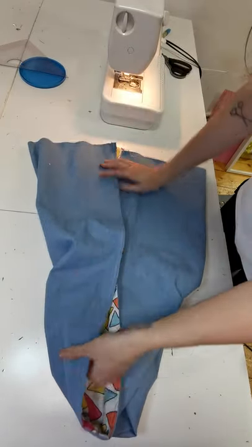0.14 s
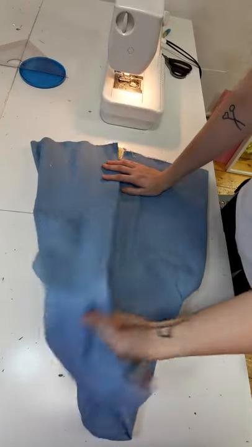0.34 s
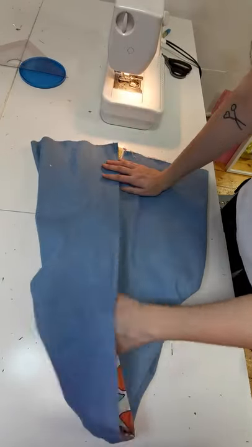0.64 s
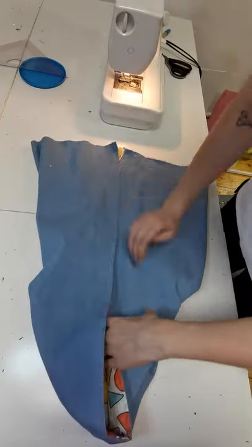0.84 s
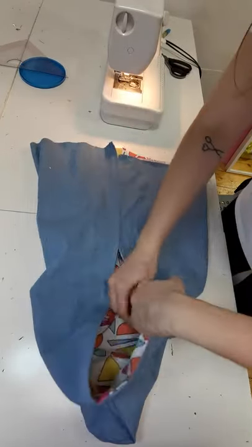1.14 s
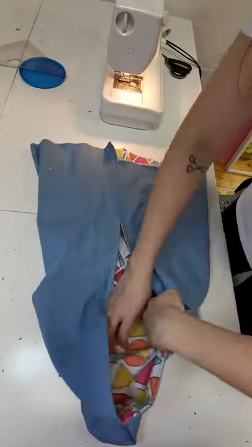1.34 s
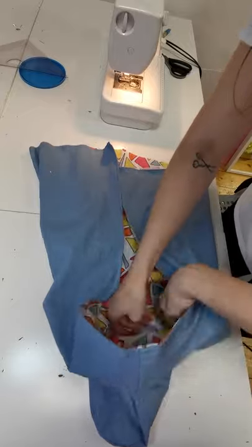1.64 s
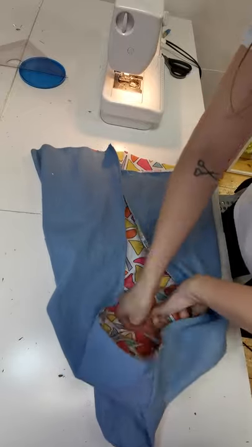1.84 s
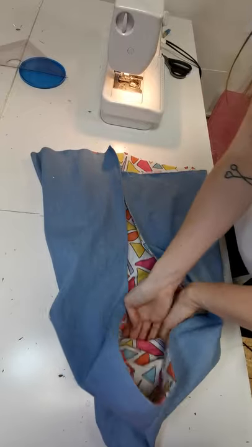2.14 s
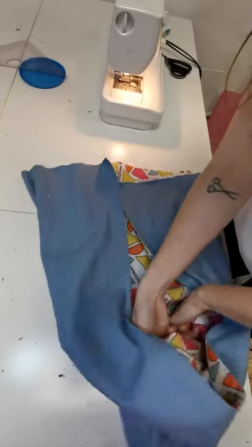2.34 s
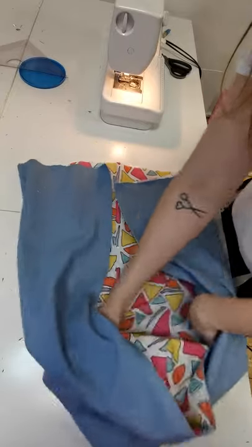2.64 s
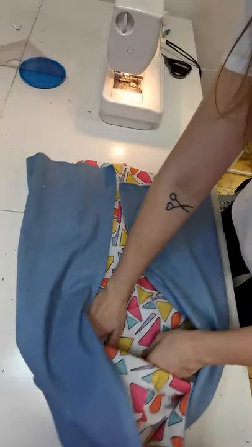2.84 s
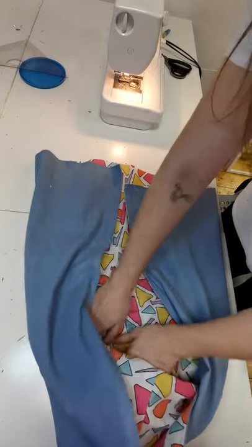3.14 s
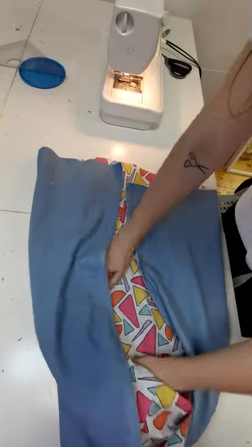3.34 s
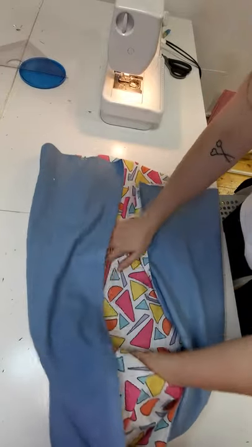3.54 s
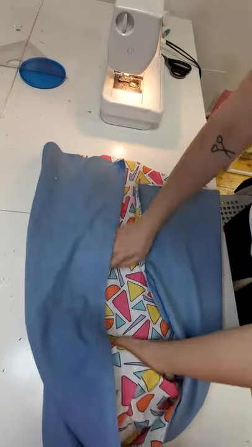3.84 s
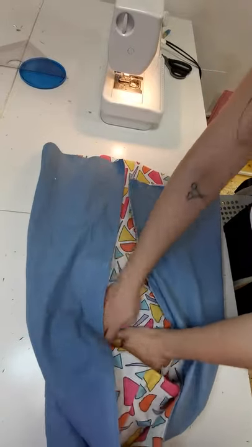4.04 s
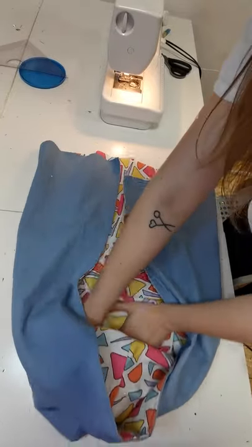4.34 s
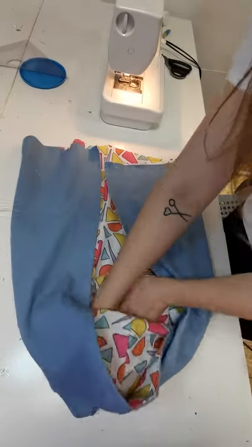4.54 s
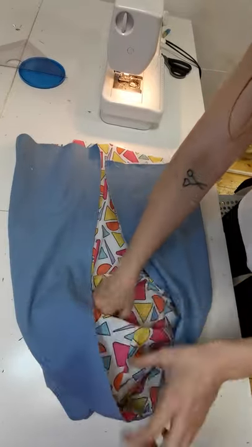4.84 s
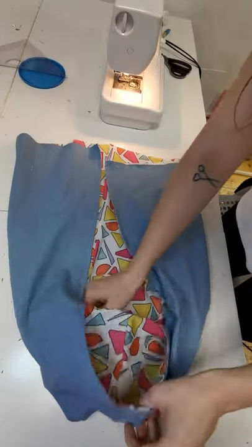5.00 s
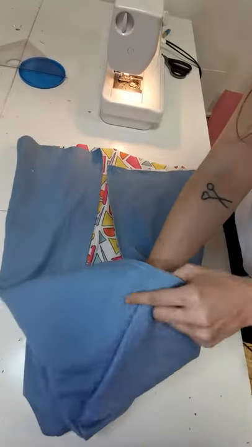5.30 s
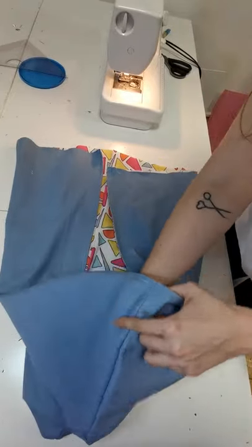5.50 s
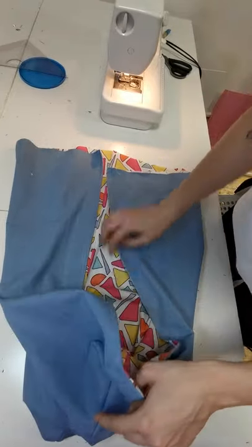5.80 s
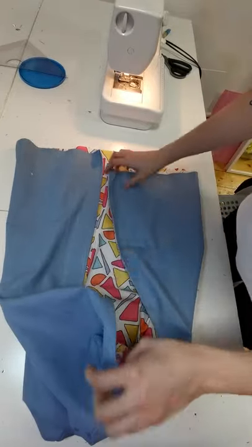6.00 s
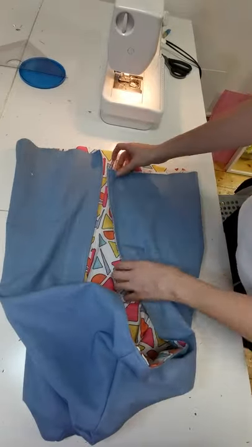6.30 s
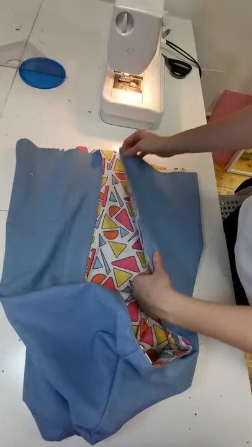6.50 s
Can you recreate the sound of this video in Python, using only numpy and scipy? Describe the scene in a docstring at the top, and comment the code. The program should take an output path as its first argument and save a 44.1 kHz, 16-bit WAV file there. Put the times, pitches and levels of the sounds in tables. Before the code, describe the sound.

Heavy lined cloth is turned and smoothed on a table, with hissing rustles, soft pats and one firm hand thump near the end.

```python
"""Thick lined cloth is turned and smoothed on a sewing table: thread catching on thread makes a hiss.
Its heavy folds drag with a dull rustle, a palm scrapes the weave and creases pop over in short pushes.
The bundle judders over the tabletop and the swinging sheet wafts slow air at the microphone ports.
Hands and slack cloth pat the table, once with a firm thump, each blow ringing modes and a small room.
Faint air noise and a low hum lie under it all."""
import sys
import numpy as np
from scipy import signal
from scipy.fft import rfft, irfft, next_fast_len
from scipy.io import wavfile
from scipy.ndimage import map_coordinates

SR = 44100
rng = np.random.default_rng(int(sys.argv[2]) if len(sys.argv) > 2 else 0)


def to_wav(sig):
    """Store sig (one row per channel, or 1-D mono) as 16-bit WAV at the path in sys.argv[1].

    Samples outside -1..1 are clipped; the rate is SR.
    """
    pcm = np.clip(np.atleast_2d(sig), -1, 1) * 32767
    pcm = np.round(pcm).astype(np.int16)
    wavfile.write(sys.argv[1], SR, pcm.T)  # frames by channels


N = 293706  # samples

# Levels in the tables are relative: the trims in the functions shift them. Spectra give shape only.
# Pulls on the cloth. Each row: fastest moment in seconds, speeding-up time in seconds,
# slowing-down time in seconds, hiss in dB, rustle in dB, lift of the treble over the rest in dB.
PULLS = [(0.11, 0.04, 0.27, -68, -70.5, 3.5), (0.288, 0.027, 0.055, -65, -63, 1),
         (0.39, 0.052, 0.019, -53, -61.5, 5), (0.555, 0.064, 0.042, -65.5, -68.5, -1),
         (1.04, 0.13, 0.053, -66.5, -70, 2), (1.35, 0.15, 0.45, -70, -85, 1),
         (1.78, 0.16, 0.71, -77.5, -73.5, -7), (2.3, 0.33, 0.026, -74, -71.5, 6),
         (2.54, 0.12, 0.1, -63.5, -60.5, -0.5), (2.92, 0.082, 0.057, -72, -60, -4),
         (3.298, 0.047, 0.06, -60, -56.5, -1), (3.605, 0.044, 0.053, -60, -57.5, 2),
         (3.66, 0.04, 0.03, -62, -70, 4), (4.03, 0.099, 0.089, -68.5, -70, 2),
         (4.27, 0.077, 0.074, -68.5, -61.5, 0), (4.45, 0.12, 0.083, -64, -59.5, -4.5),
         (4.67, 0.064, 0.093, -71.5, -73.5, 1), (5.02, 0.1, 0.21, -70.5, -72, 1),
         (5.2, 0.034, 0.076, -68.5, -61.5, 4), (5.57, 0.044, 0.089, -74, -79, 0),
         (6.02, 0.11, 0.14, -73, -96, 6.5), (6.35, 0.037, 0.031, -77, -63.5, -7),
         (6.6, 0.098, 0.036, -67.5, -95, 4.5)]
# Light, constant shifting between pulls. Each row: time in seconds, hiss in dB.
SHIFTING = [(0, -71.5), (0.47, -74.5), (0.66, -69), (0.78, -77.5), (1.15, -72.5), (1.9, -72), (2.02, -81.5),
            (2.15, -70), (2.75, -70.5), (3.1, -75), (3.5, -72), (3.8, -72.5), (4.6, -73), (4.87, -78),
            (5.35, -71), (5.8, -79), (6.2, -79), (6.4, -74.5)]
# Spectrum of the weave's hiss. Each row: frequency in Hz, density in dB per Hz.
WEAVE = [(800, -3), (2000, 3), (3300, 0), (4800, 0), (7000, 0), (8000, -2), (10800, -3.5), (13200, -7),
         (14100, -11.5), (15500, -7.5)]
# Spectrum of the folds' rustle. Each row: frequency in Hz, density in dB per Hz.
RUSTLE = [(120, 1), (220, 2), (320, 5), (520, -1.5), (800, 1), (1200, -7), (1650, -12.5), (2100, -10),
          (2700, -16), (3500, -28.5), (7000, -27.5)]
# Treble resonances of the microphone ports.
# Each row: frequency in Hz, half width at half amplitude in Hz, level in dB for an unlifted treble.
LEFT_PORT = [(9250, 240, -0.5)]
RIGHT_PORT = [(10830, 400, -5.5), (13600, 300, -6)]
# A palm or forearm rubbing the cloth. Each row: fastest moment in seconds, speeding-up time in seconds,
# slowing-down time in seconds, level in dB, scrape pitch in Hz, glide in octaves per second.
PALM = [(0.2, 0.19, 0.26, -66, 2080, 0), (1.33, 0.04, 0.053, -61, 2410, 1.29),
        (1.74, 0.2, 0.28, -65.5, 1960, 0.027)]
# Spectrum of skin on cloth. Each row: frequency in Hz, density in dB per Hz.
SKIN = [(700, -14), (1300, 7.5), (1700, 2), (2100, -2), (2600, 0), (3200, -13.5)]
# Creases flicking over. Each row: time in seconds, peak in dB, pitch in Hz.
FLICKS = [(0.168, -46, 900), (0.399, -53, 900), (0.636, -41, 476), (0.9306, -42.5, 663),
          (1.2304, -40.5, 634), (1.348, -43.5, 820), (1.7996, -44, 750), (1.8231, -40, 590),
          (2.452, -40, 650), (2.476, -32.5, 500), (2.554, -38, 428), (2.5716, -42, 635), (2.891, -46, 650),
          (2.9279, -34.5, 646), (3.313, -48, 900), (3.557, -48, 800), (3.589, -37, 750),
          (3.597, -35.5, 486), (4.202, -40, 560), (4.265, -41.5, 596), (4.61, -44, 576), (4.9495, -37, 890),
          (5.273, -37.5, 854), (5.287, -37, 1240), (5.6288, -45, 766), (6.336, -47, 1900)]
# The bundle shoved over the tabletop. Each row: fastest moment in seconds, speeding-up time in seconds,
# slowing-down time in seconds, level in dB, upper edge in Hz.
SHOVES = [(0.16, 0.17, 0.12, -51, 288), (2.6, 0.26, 0.06, -57, 258), (3.12, 0.22, 0.22, -51.5, 100),
          (3.7, 0.26, 0.051, -52.5, 141), (4.25, 0.11, 0.049, -62, 293)]
# Air pushed by the moving sheet. Each row: time in seconds, level in dB.
WAFT = [(0, -45.5), (0.17, -47.5), (0.3, -53.5), (0.8, -57.5), (1.5, -64), (2.3, -62.5), (2.85, -58),
        (3.15, -56), (3.7, -59.5), (4.5, -66), (6.66, -63)]
# Spectrum of the moving air. Each row: frequency in Hz, density in dB per Hz.
AIR = [(8, -6), (22, -1), (38, -5.5), (55, -12), (80, -25), (130, -15.5), (300, -65)]
# Soft blows on the table. Each row: time in seconds, peak in dB, pitch of the push in Hz.
PATS = [(0.191, -42.5, 133), (1.853, -28.5, 300), (1.892, -42, 260), (2.1192, -33.5, 298),
        (2.278, -44, 153), (2.7315, -30, 213), (2.749, -37, 198), (2.771, -45, 220), (2.8469, -33, 280),
        (3.258, -27.5, 210), (3.2799, -36, 300), (3.598, -37, 330), (3.603, -37, 99), (3.895, -48.5, 109),
        (4.0412, -40.5, 100), (4.067, -37, 238), (4.148, -49, 300), (4.185, -43, 297), (4.275, -47, 260),
        (4.4091, -35.5, 306), (4.4227, -41.5, 93), (4.442, -42, 340), (4.4943, -39, 300),
        (6.3532, -29.5, 199)]
# Modes of the tabletop, detuned a little at each blow. Each row: frequency in Hz, level in dB, t60 in seconds.
TABLE = [(102.5, -17, 0.27), (123.6, -20, 0.2), (166.7, -22, 0.29), (256.5, -30.5, 0.18), (290, -28, 0.19),
         (325, -24, 0.24), (441, -30, 0.27), (550.6, -27.5, 0.27), (596, -20, 0.096), (653, -31, 0.3)]
# Spectrum of the table's many weak modes. Each row: frequency in Hz, density in dB per Hz.
CROWD = [(70, -35), (130, 7), (200, 0), (290, 2), (440, -4), (505, -20), (620, 1), (760, -20), (950, -20),
         (1400, -60)]
# Spectrum of the still room. Each row: frequency in Hz, density in dB per Hz.
QUIET = [(22, -4), (35, -10.5), (70, 0.5), (112, 1), (140, -6.5), (400, -9), (700, -14), (1230, -17),
         (2030, -19), (3750, -27), (9500, -45.5), (15500, -34)]
# The room's hum. Each row: frequency in Hz, level in dB.
HUM = [(100, -61), (164, -70.5), (456, -76)]
# The cloth lies to the right. Each row: frequency in Hz, left minus right in dB.
CLOTH_SIDE = [(300, 1.5), (560, -7.5), (1500, -4.5), (7500, -2.5), (11000, -6), (14000, -10.5)]
# Likeness of the two ports in a diffuse field. Each row: frequency in Hz, correlation.
ALIKE = [(120, 0.89), (300, 0.87), (600, 0.34), (1100, 0.048), (3000, 0.02), (15000, 0.027)]
# Decay of the room. Each row: frequency in Hz, t60 in seconds.
ROOM = [(100, 0.31), (300, 0.28), (1000, 0.17), (8000, 0.092)]

STROKE_SHAPE = 2.32  # exponent: 2 is a bell; more is flatter on top with steeper flanks
SHIFT_RUSTLE_DB = 2.5  # rustle of the light shifting over its hiss
# table ring under a firm blow; a push slower than FIRM_HZ sets the top moving more
RING_DB, FIRM_HZ, PRESS_DB_PER_OCTAVE = 4, 197, 12
# the firm thump: a hand lands in quick contacts, each later, weaker and softer than the last
THUMP_S, THUMP_DB, THUMP_HZ, THUMP_RING_DB = 6.2712, -17.5, 308, 8
CONTACT_GAP_S, GAP_GROWS, CONTACT_LOSS_DB, CONTACT_SOFTENS = 0.00703, 1.15, 2, 0.38
HAND_DAMPS_DB = 3.5  # less ring at each contact as the hand settles
QUIET_DB = -64  # air noise of the still room, rms
TOP_HZ = 15780  # band limit


def amp(db):
    """A level in decibels is twenty times the logarithm of this gain."""
    return 10 ** (np.asarray(db) / 20)


def unit(x):
    """Dividing by the root mean square gives unit power."""
    return x / np.sqrt(np.mean(x ** 2) + 1e-20)


def along(points, hz):
    """Interpolate (Hz, value) rows on a logarithmic frequency axis."""
    f, v = np.transpose(points)
    return np.interp(np.log(hz + 1), np.log(f + 1), v)


def curve(rows):
    """Interpolate (second, value) rows linearly, one value per sample."""
    return np.interp(np.arange(N) / SR, *np.transpose(rows))


def wobble(rate):
    """Smooth random fluctuation: a spline through random knots, rate of them per second."""
    knots = rng.standard_normal(int(N * rate / SR) + 4)
    return map_coordinates(knots, [np.arange(N) * rate / SR])


def filtered(x, response):
    """Linear filtering: the spectrum of x is multiplied by a response of frequency."""
    size = x.shape[-1]
    padded = next_fast_len(size + 8192)
    spectrum = rfft(x, padded) * response(np.fft.rfftfreq(padded, 1 / SR))
    return irfft(spectrum, padded)[..., :size]


def add(track, s, sound):
    """Superposition: pressures add from time s on."""
    start = max(round(s * SR), 0)
    part = track[..., start:start + sound.shape[-1]]
    part += sound[..., :part.shape[-1]]


def spread(pair):
    """Diffuse-field coherence: two unrelated signals become alike in the bass, unrelated in the treble."""
    turn = lambda hz: np.arccos(np.clip(along(ALIKE, hz), -1, 1)) / 2
    mid, side = filtered(pair, lambda hz: np.array([np.cos(turn(hz)), np.sin(turn(hz))]))
    return np.array([mid + side, mid - side])


def to_right(pair):
    """Acoustic shading: the left port is turned from the cloth, by an amount that varies with frequency."""
    return filtered(pair, lambda hz: amp(np.outer([.5, -.5], along(CLOTH_SIDE, hz))))


def coloured(pair, spectrum):
    """Spectral shaping of a diffuse field whose mid then has rms 1."""
    out = filtered(spread(pair), lambda hz: amp(along(spectrum, hz)))
    return out / np.std(out.mean(0))


def slips(rate, size_db, smooth):
    """Stick-slip friction: tiny releases of scattered size over a smooth rub."""
    sizes = amp(size_db * rng.standard_normal(N).clip(-2, 2))
    ticks = (rng.random(N) < rate / SR) * sizes
    return unit(ticks * rng.standard_normal((2, N))) + smooth * rng.standard_normal((2, N))


def stroke(s, rise, fall):
    """Kinematics of a hand: speed, 0 to 1, gathers until time s, then dies away."""
    t = np.arange(N) / SR - s
    scaled = np.abs(t / np.where(t < 0, rise, fall))
    return np.exp(-np.minimum(scaled, 5) ** STROKE_SHAPE)


def jerking(rate, life, size_db, scatter):
    """Relaxation: cloth catches and lets go at an uneven rate, in brief pulses; a gain of rms 1."""
    count = int(2 * N * rate / SR)
    at = np.cumsum(np.exp(scatter * rng.standard_normal(count))) * SR / rate
    sizes = amp(size_db * rng.standard_normal(count).clip(-1.5, 1.5))
    inside = at < N
    releases = np.bincount(at[inside].astype(int), sizes[inside], N)
    t = np.arange(SR // 20) / SR / life  # each pulse peaks one life after its release
    return unit(signal.fftconvolve(releases, t * np.exp(-t))[:N])


def push(t, hz):
    """Contact pressure: a dip, a peak at t = 0 and a dip, about one cycle of hz."""
    u = (np.pi * t * hz) ** 2
    return (1 - 2 * u) * np.exp(-u)


def room(sound, build=0.001, lowest_hz=110):
    """Reverberation: a new diffuse decaying tail each time; a small room holds no deep bass."""
    hz, t, noise = signal.stft(rng.standard_normal((2, SR // 2)), SR, nperseg=256)
    decay = amp(-60 * t / along(ROOM, hz)[:, None])
    tail = signal.istft(noise * decay * (1 - np.exp(-t / build)), SR)[1]
    tail = filtered(spread(tail), lambda f: 1 - 1 / (1 + (f / lowest_hz) ** 6))
    return signal.fftconvolve(sound[None], tail / np.linalg.norm(tail[0]), axes=1)


def handling(uneven_db=1.1, uneven_rate=24):
    """Addition of powers: pulls ride on the light shifting, unevenly; gives hiss, rustle, brightness in dB."""
    hiss = amp(curve(SHIFTING)) ** 2
    rustle, bright = hiss * amp(SHIFT_RUSTLE_DB) ** 2, np.zeros(N)
    for s, rise, fall, hiss_db, rustle_db, top_db in PULLS:
        speed = stroke(s, rise, fall)
        power = (amp(hiss_db) * speed) ** 2
        hiss = hiss + power
        bright = bright + top_db * power  # brightness is weighted by hiss power
        rustle = rustle + (amp(rustle_db) * speed) ** 2
    uneven = uneven_db * wobble(uneven_rate)
    return 10 * np.log10(hiss) + uneven, 10 * np.log10(rustle) + uneven, bright / hiss


def catching(pull_db, coarse=0.43, hard_db=-58):
    """Load-dependent friction: a fold drags softly under a light pull, in coarse jerks under a hard one."""
    share = np.clip(coarse * amp((pull_db - hard_db) / 2), 0, 0.65)
    jerks = jerking(rate=130, life=.0011, size_db=2.5, scatter=.6)
    return np.sqrt(share * jerks ** 2 + 1 - share)


def sliding(slide_db, bright_db, catch, flutter_db=0.67, echo=0.13, echo_time=0.000451, roam=0.11,
            knee_hz=8700, grip=0.25, ring_grows=1.7):
    """Dense stick-slip: threads catch on threads; a bright stroke also rings the microphone ports."""
    grain = coloured(slips(rate=5000, size_db=3, smooth=1.5), WEAVE)
    # the tabletop reflects the hiss, and the path changes as the hands move
    late = np.arange(N) - SR * echo_time * np.exp(roam * wobble(3))
    reflected = np.array([map_coordinates(port, [late]) for port in grain])
    grain = (grain + echo * reflected) / np.hypot(1, echo)
    top = filtered(grain, lambda hz: 1 - 1 / (1 + (hz / knee_hz) ** 10))

    def resonance(port, f):
        return sum(amp(db) / (1 + ((f - hz) / width) ** 2) for hz, width, db in port)

    ring = filtered(grain, lambda f: np.array([resonance(port, f) for port in (LEFT_PORT, RIGHT_PORT)]))
    tilt = amp(bright_db / 2)
    body = (grain - top) / tilt * catch ** grip
    hiss = body + top * tilt + ring * amp(ring_grows * bright_db / 2)
    return to_right(hiss) * amp(slide_db + flutter_db * wobble(60))


def rustling(pull_db, catch, rustle_db=4.5, flutter_db=1):
    """Friction and buckling: heavy folds drag with a dull, coarse rustle."""
    grain = coloured(rng.standard_normal((2, N)) * catch, RUSTLE)
    return to_right(grain) * amp(pull_db + rustle_db + flutter_db * wobble(40))


def rubbing(band_db=-6, broad_db=-4.5, width_hz=200):
    """Periodic ribs make a pitch: skin scrapes out a narrow gliding band over a broad whisper."""
    t, out = np.arange(N) / SR, np.zeros((2, N))
    for s, rise, fall, db, hz, glide in PALM:
        pitch = hz * 2 ** (glide * np.clip(t - s, -2 * rise, 2 * fall))
        scatter = unit(filtered(rng.standard_normal((2, N)), lambda f: 1 / (1 + (f / width_hz) ** 2)))
        band = np.sqrt(2) * scatter * np.sin(2 * np.pi * np.cumsum(pitch) / SR)
        whisper = coloured(rng.standard_normal((2, N)), SKIN)
        out += amp(db) * stroke(s, rise, fall) * (amp(band_db) * band + amp(broad_db) * whisper)
    return to_right(out) * jerking(rate=380, life=.002, size_db=3, scatter=.5)


def flicks(flick_db=-3.0, room_db=-6.0, fray=0.23, fray_time=0.0032, lean_db=4):
    """Snap-through: a crease pops over with a push and a scratch of fibres, mostly into the right port."""
    lead = .004  # seconds kept before the peak
    out, t = np.zeros((2, N)), np.arange(SR // 40) / SR - lead
    for s, db, hz in FLICKS:
        fibres = filtered(rng.standard_normal(len(t)), lambda f: 1 / (1 + (f / 3500) ** 2))
        scratch = fray * (t > 0) * np.exp(-abs(t) / fray_time) * fibres
        pop = amp(db + flick_db) * (push(t, hz) + scratch)
        add(out, s - lead, np.outer(amp([-lean_db, lean_db]), pop))
        add(out, s - lead, amp(room_db) * to_right(room(pop)))
    return out


def shoving(shove_db=-2, judder_db=1, lowest_hz=30):
    """Low-frequency friction: the bundle judders dully over the tabletop, each shove with its own upper edge."""
    out = np.zeros((2, N))
    for s, rise, fall, db, hz in SHOVES:
        noise = spread(rng.standard_normal((2, N)))
        rub = unit(filtered(noise, lambda f: f / np.hypot(f, lowest_hz) / (1 + (f / hz) ** 8)))
        out += amp(db) * stroke(s, rise, fall) * rub
    return out * amp(shove_db + judder_db * wobble(40))


def wafting(waft_db=-1, lean_db=1.0):
    """Displaced air: slow flow from the swinging cloth reaches both ports, the left a little more."""
    air = coloured(rng.standard_normal((2, N)), AIR)
    return air * amp(curve(WAFT) + waft_db) * amp([[lean_db], [-lean_db]])


def blows():
    """Impact and settling: pats, then the thump's contacts, as (s, peak dB, Hz, ring dB)."""
    contacts = []
    for s, db, hz in PATS:
        slower_octaves = max(np.log2(FIRM_HZ / hz), 0)
        contacts.append((s, db, hz, RING_DB + PRESS_DB_PER_OCTAVE * slower_octaves))
    for k in range(3):
        contacts.append((THUMP_S + CONTACT_GAP_S * k ** GAP_GROWS,
                         THUMP_DB - CONTACT_LOSS_DB * k ** 2,
                         THUMP_HZ / (1 + CONTACT_SOFTENS * k ** 2),
                         THUMP_RING_DB - HAND_DAMPS_DB * k))
    return contacts


def pats(pat_db=-.5, wet_db=-11, attack=0.0015, crowd_db=-21.5, crowd_t60=0.33, crowd_build=0.02,
         lowest_hz=50, rebound=0.21, rebound_cycles=1.114):
    """Modal excitation: a blow puffs out air with a small rebound, rings the tabletop and wakes the room."""
    lead = .015  # seconds kept before the peak
    out, t = np.zeros((2, N)), np.arange(SR // 2) / SR - lead
    since = np.maximum(t, 0)
    for s, db, hz, ring_db in blows():
        puff = push(t, hz) + rebound * push(t - rebound_cycles / hz, hz)
        # the hands load the top differently at every blow
        loaded = np.exp(.015 * rng.standard_normal(len(TABLE)))
        # a slow, soft contact barely reaches the higher modes
        reach = lambda f: 1 / (1 + (f / (2.0 * hz)) ** 4)
        ring = np.zeros(len(t))
        for (f, level, t60), load in zip(TABLE, loaded):
            decay = amp(level + rng.normal(0, 1.0) - 60 * since / t60)
            ring += decay * np.cos(2 * np.pi * f * load * since) * reach(f)
        crowd = filtered(coloured(rng.standard_normal((2, len(t))), CROWD), reach)
        crowd = crowd * amp(crowd_db - 60 * since / crowd_t60) * (1 - np.exp(-since / crowd_build))
        blow = amp(pat_db) * puff + amp(ring_db) * ring * (1 - np.exp(-(since / attack) ** 2))
        add(out, s - lead, amp(db) * (blow + crowd))
        add(out, s - lead, amp(db + wet_db) * room(puff))
    return filtered(out, lambda f: 1 - 1 / (1 + (f / lowest_hz) ** 4)) * amp([[.3], [-.3]])


def background(lean=0.4, waver=.17):
    """Stationary noise and tones: faint air noise, its treble leaning right, and a slightly wavering hum."""
    out = coloured(rng.standard_normal((2, N)), QUIET) * amp(QUIET_DB)
    out = filtered(out, lambda hz: amp(lean * np.outer([.5, -.5], along(CLOTH_SIDE, hz))))
    for hz, db in HUM:
        phase = 2 * np.pi * (hz * np.arange(N) / SR + rng.random()) + waver * wobble(2.4)
        out = out + np.sqrt(2) * amp(db) * (1 + waver * wobble(4.8)) * np.sin(phase)
    return out


def scene():
    """Superposition of cloth, table and room."""
    slide_db, pull_db, bright_db = handling()
    catch = catching(pull_db)
    cloth = sliding(slide_db, bright_db, catch) + rustling(pull_db, catch) + rubbing() + flicks()
    return cloth + shoving() + wafting() + pats() + background()


def record(dry, lag=.00009):
    """Path difference: sound reaches the left port lag seconds later; nothing passes above the band limit."""
    return filtered(dry, lambda hz: np.exp(np.outer([-1j, 1j], np.pi * hz * lag)) * (hz < TOP_HZ))


dry = scene()
out = record(dry)
to_wav(out)
```